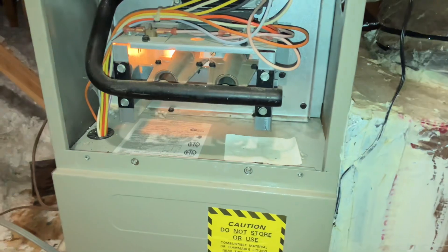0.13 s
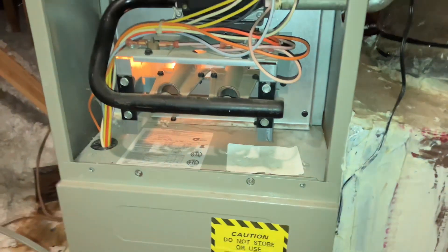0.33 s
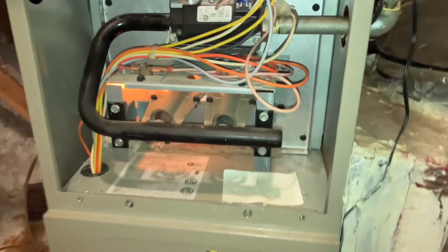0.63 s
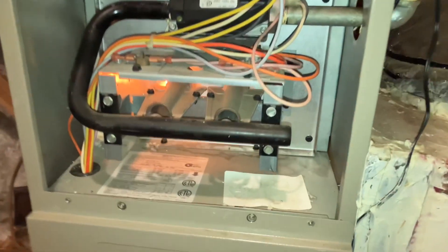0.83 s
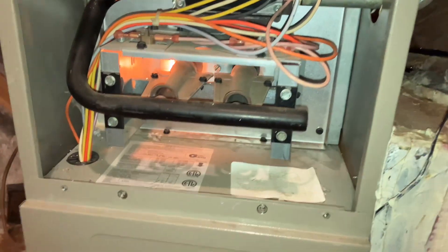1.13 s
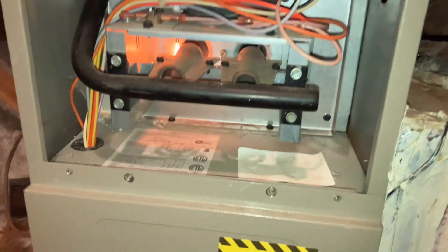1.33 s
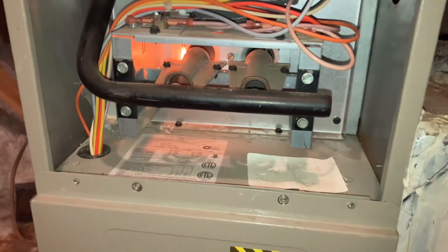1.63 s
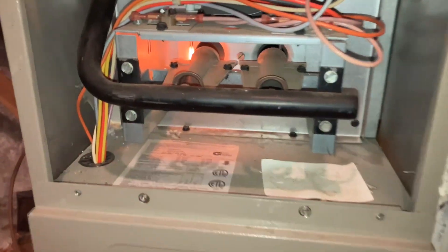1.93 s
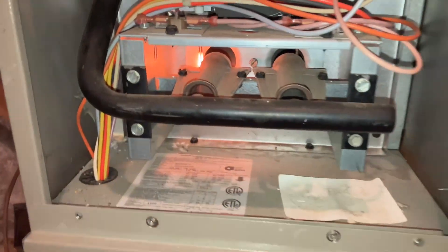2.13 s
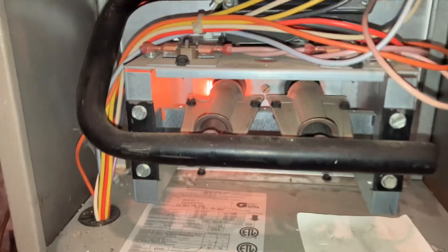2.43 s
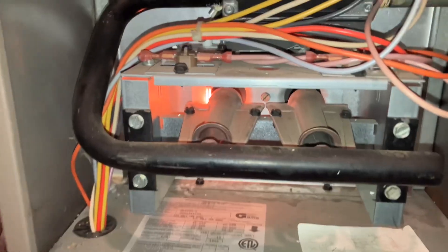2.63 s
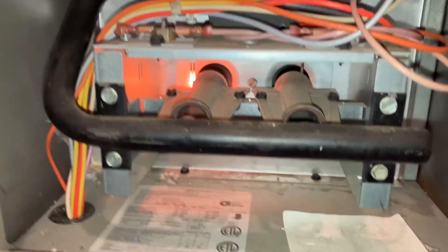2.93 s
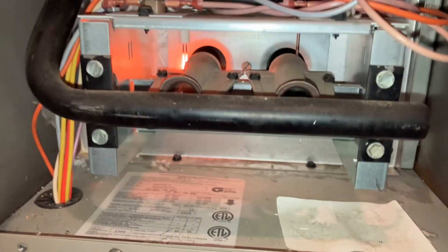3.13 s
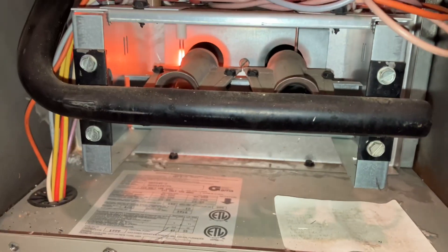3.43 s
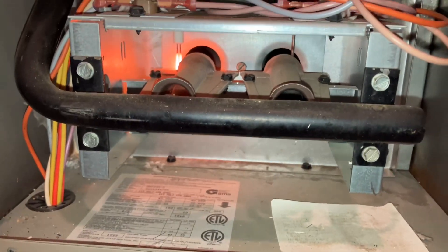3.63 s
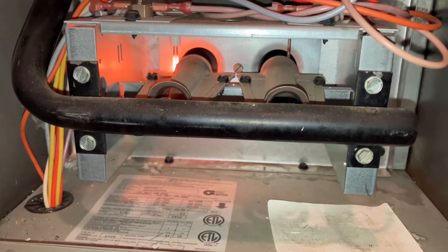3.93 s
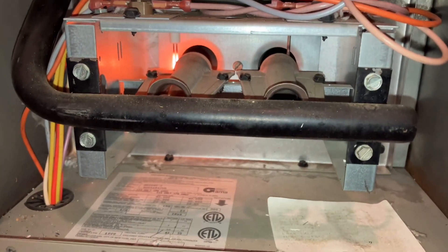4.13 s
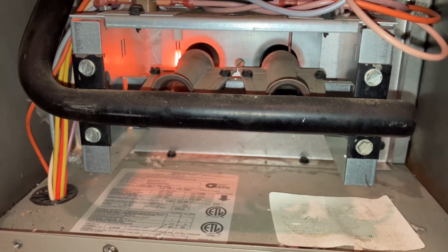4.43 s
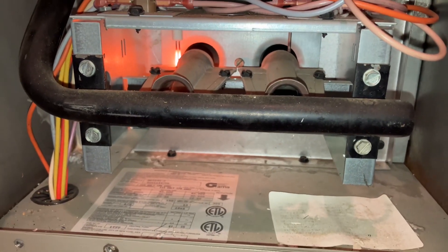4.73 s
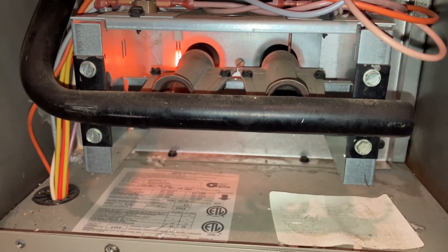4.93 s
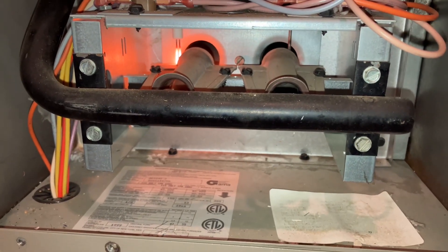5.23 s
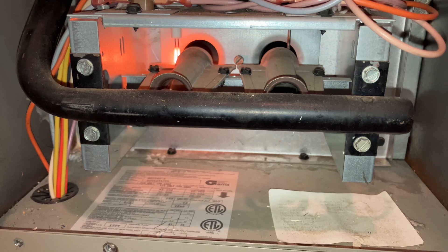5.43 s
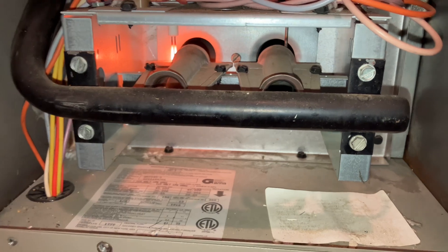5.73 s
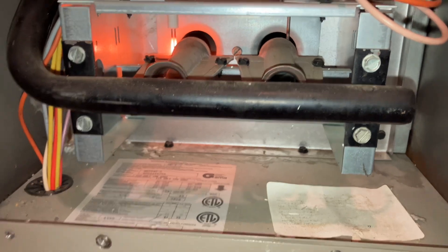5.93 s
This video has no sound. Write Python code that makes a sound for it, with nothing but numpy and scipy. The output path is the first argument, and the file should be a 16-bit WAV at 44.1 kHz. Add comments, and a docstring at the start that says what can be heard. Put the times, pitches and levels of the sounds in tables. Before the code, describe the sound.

A small furnace motor hums low and steady with rushing air inside a metal cabinet, growing closer and brighter as the microphone moves in.

```python
"""Furnace inducer motor in an attic

In an attic, a gas furnace's inducer motor hums steadily: shaft and mains pull together make families of tones.
The fan wheel pushes rushing air through the sheet-metal cabinet: shaped noise that booms low in one resonance
and whistles faintly in narrow cavity modes. The bearing sings in short pulses, one narrow ring of the housing.
A hand-held stereo microphone starts standing back, moves in towards the open burner compartment, then comes
down towards the level of the burner tubes, which shifts levels, colour and stereo image."""
import sys
import numpy as np
from scipy import signal
from scipy.fft import rfft, irfft, next_fast_len
from scipy.io import wavfile
from scipy.ndimage import uniform_filter1d, map_coordinates

SR = 44100
rng = np.random.default_rng(int(sys.argv[2]) if len(sys.argv) > 2 else 0)


def to_wav(s):
    """Save 16-bit WAV."""
    ch = np.atleast_2d(s).T  # columns
    pcm = np.round(np.clip(ch, -1, 1) * 32767)  # PCM
    wavfile.write(sys.argv[1], SR, pcm.astype(np.int16))


N = 267775
TIME = np.arange(N) / SR  # s
SHAFT_HZ = 55.275  # mean turns per second
PULL_HZ = 119.95  # magnetic pull, at twice the mains
EDGE_HZ = 15750  # upper band limit
START_CLOSENESS = -0.23  # a little farther off than standing back


def gain_of(db):
    """Decibels to amplitude."""
    return 10 ** (np.asarray(db) / 20)


def evened(x):
    """Scales to an rms of 1."""
    return x / np.sqrt(np.mean(abs(x) ** 2) + 1e-20)


def read(table, hz):
    """Each column of a table at the given frequencies, joined on a log axis."""
    f, *columns = np.transpose(table)
    return [np.interp(np.log(hz + 1), np.log(f), column) for column in columns]


def wander(rate_hz, size=8192):
    """Slow chance of rms 1, with changes up to about the given rate."""
    hz = np.fft.rfftfreq(size, TIME[-1] / size)
    low_pass = np.exp(-(hz / rate_hz) ** 2) * (hz > 0)
    slow = irfft(rfft(rng.standard_normal(size)) * low_pass)
    return np.interp(TIME, np.linspace(0, TIME[-1], size), evened(slow))


def fuzzy_swing(width_hz):
    """Random complex swing of rms 1 that spreads a ring over a narrow band."""
    return evened(wander(width_hz) + 1j * wander(width_hz))


def eased(t, start_s, length_s):
    """A move of the hand from 0 to 1 that starts and stops gently."""
    return .5 - .5 * np.cos(np.pi * np.clip((t - start_s) / length_s, 0, 1))


# The microphone's moves: (start [s], length [s], closeness gained [1], descent gained [1])
# closeness: 0 = standing back, 1 = at the burners; descent: 0 = above, 1 = level with the burner tubes
MICROPHONE_MOVES = [(.45, 0.54, 0.49, 0), (1.64, 0.7, 0.81, 0.13), (2.45, 0.73, 0.035, 0.73)]


def closeness(t):
    """How near the microphone is to the burners at the times t."""
    gained = sum(nearer * eased(t, start_s, length_s) for start_s, length_s, nearer, _ in MICROPHONE_MOVES)
    return START_CLOSENESS + gained


def lowered(t):
    """How far the microphone has come down to the level of the burner tubes at the times t."""
    return sum(lower * eased(t, start_s, length_s) for start_s, length_s, _, lower in MICROPHONE_MOVES)


def travelled(t):
    """How far the microphone has come along its path, in plus down."""
    return closeness(t) + lowered(t)


def panned(balance_db):
    """Left and right gains of mean power 1 for a level difference."""
    gains = gain_of(np.array([balance_db, -balance_db]) / 2)
    return gains / np.sqrt(np.mean(gains ** 2, axis=0))


def at_ports(swing, hz, lead):
    """A ring at hz with the given swing, as the two microphone ports hear it, the left leading by radians."""
    ring = np.sqrt(2) * swing * np.exp(2j * np.pi * hz * TIME)
    return np.array([ring, ring * np.exp(-1j * lead)]).real


def swelled(swing, swells, swell_s):
    """For a moment at each swell, a steady ring of that level takes over from the random swing."""
    for centre_s, db in swells:
        bell = np.exp(-((TIME - centre_s) / swell_s) ** 2)
        steady = gain_of(db) * np.exp(2j * np.pi * rng.random())
        swing = swing * (1 - bell) + bell * steady
    return swing


# Motor tones, before a common trim:
# (shaft multiple [1], pull multiple [1], level standing back [dB], level close [dB], left-right [dB])
MOTOR_TONES = [(1, 0, -43, -42.8, 0), (3, 0, -60, -52, 0), (8, 0, -48.7, -48.7, 1), (10, 0, -52, -52, -12),
               (11, 0, -68, -60, 0), (15, 0, -60, -62, 3), (16, 0, -49.5, -43.7, 0), (17, 0, -62, -55, 1),
               (18, 0, -47.6, -42.2, 2), (19, 0, -61, -50.5, 9), (20, 0, -65, -60, 1),
               (34, 0, -60, -59.5, -1), (40, 0, -73, -65, 1), (16, -1, -62, -64, -1), (17, -1, -61, -65, 0),
               (18, -1, -62, -56, -2), (0, 1, -38, -35.9, 1), (2, 1, -56, -47.5, 0), (14, 1, -59, -55, 0),
               (15, 1, -63, -59, 3), (16, 1, -54, -49, -1), (17, 1, -50.5, -40.2, 4), (18, 1, -58, -61, 12),
               (19, 1, -62, -58, 3), (36, 1, -59, -53, 0), (1, 2, -37.6, -36, 1), (2, 2, -42.5, -38.3, 2),
               (3, 2, -67, -57, 1), (14, 2, -75, -62, 0), (15, 2, -66, -61, 0), (17, 2, -55, -51, 6),
               (18, 2, -59, -52.5, 2), (19, 2, -65, -59, 12), (22, 2, -68, -64, 0), (35, 2, -73, -63, 12),
               (36, 2, -70, -65, 1), (-1, 3, -52, -47, 1), (0, 3, -48, -45, 2), (1, 3, -54, -55, 0),
               (16, 3, -65, -56, 3), (-1, 4, -56, -55, 0), (1, 4, -56, -57.5, -2), (0, 5, -62, -59, 0),
               (2, 6, -62, -62, 0)]


def motor(turns, trim_db=-0.23, waver_db=0.5, waver_hz=3, port_lag_s=.00004, descent_share=0.21):
    """Shaft orders, with side tones where the magnetic pull throbs against them."""
    near = (1 - descent_share) * closeness(TIME) + descent_share * lowered(TIME)
    out = np.zeros((2, N))
    for order, pull, back_db, close_db, balance_db in MOTOR_TONES:
        order, pull = round(order), round(pull)
        cycles = order * turns + pull * PULL_HZ * TIME + rng.random()
        lag = (order * SHAFT_HZ + pull * PULL_HZ) * port_lag_s  # cycles; the right port hears it a little later
        level_db = trim_db + back_db + near * (close_db - back_db)
        size = gain_of(level_db + waver_db * wander(waver_hz))
        tone = np.sin(2 * np.pi * np.array([cycles, cycles - lag]))
        out += np.sqrt(2) * size * panned(balance_db)[:, None] * tone
    return out


# The bearing sings out for a moment: (time [s], level [dB])
BEARING_SWELLS = [(1.725, -41), (2.352, -42), (3.127, -39.5), (3.312, -39), (3.70, -42), (3.761, -36.5),
                  (3.88, -36), (4.142, -37), (4.25, -40), (4.432, -37.5), (4.501, -38), (4.66, -46),
                  (4.811, -39), (4.919, -39), (5.493, -45), (5.572, -40.5), (5.68, -44), (5.752, -38)]


def bearing(turns, ring_hz=2106, width_hz=38, above_db=-58, low_db=-52.5, throb=0.49, rub_turn=0.51,
            slip_throb=0.66, slip_turn=0.33, swell_s=0.016, lead=0.86):
    """A rub once a turn excites a narrow ring of the housing; it pulses as the rotor slips behind the mains."""
    rub = 1 + throb * np.cos(2 * np.pi * (turns - rub_turn))
    slip = 1 + slip_throb * np.cos(2 * np.pi * (PULL_HZ * TIME - 2 * turns - slip_turn))
    ring = evened(rub * slip * fuzzy_swing(width_hz))
    ring *= gain_of(above_db + lowered(TIME) * (low_db - above_db))  # clearest in line with the burner tubes
    return at_ports(swelled(ring, BEARING_SWELLS, swell_s), ring_hz, lead)


def standing_waves(t, hz, spacing_hz=36, widening_hz=6000, steps_per_approach=2.41, sway_per_s=0.81, size=64):
    """Ripple of rms 1 over frequency from echoes between metal walls; it shifts as the microphone travels."""
    pattern = rng.standard_normal((1024, size))
    ripples = np.log1p(hz / widening_hz) * widening_hz / spacing_hz  # broader in the treble
    travel = steps_per_approach * travelled(t) + sway_per_s * t + 2
    places = np.broadcast_arrays(ripples, travel)
    return evened(map_coordinates(pattern, places, order=2, mode="mirror"))


def patches(shape, size=16, order=2):
    """Chance of rms 1 in patches about 170 Hz wide and a tenth of a second long."""
    across_hz = uniform_filter1d(rng.standard_normal(shape), size, axis=0)
    return evened(uniform_filter1d(across_hz, order, axis=1))


# Rush of air at the burners, before the cabinet colours it: (frequency [Hz], density [dB per Hz])
AIR_RUSH = [(22, -96), (45, -71), (62, -55), (130, -55.5), (330, -59), (480, -66), (750, -72), (1550, -79),
            (2700, -74), (3700, -79), (5400, -86), (6600, -84.5), (8000, -89), (11500, -91),
            (15500, -100.5)]
# Change of that rush when standing back: (frequency [Hz], change [dB])
STANDING_BACK_CHANGE = [(30, -3), (100, -2.5), (250, -4), (700, -1.5), (1250, -0.5), (2200, -2),
                        (2800, -1.5), (3300, -4), (4200, -3), (15500, -0.5)]
# Resonances of the cabinet and the burner tubes:
# (centre [Hz], width [Hz], boost from above [dB], boost level with the tubes [dB])
CABINET_RESONANCES = [(126, 13, 4, 0), (172, 14, 0.5, -10), (209, 61, 0.9, 3), (274, 18.6, 5.5, 7),
                      (325, 24, 1, 1), (398, 28, -3.5, -1), (421, 34, 4.5, 3), (476, 14, 5, 1.5),
                      (597, 55, 5.5, 4.5), (1122, 420, 8, 7), (1438, 127, 4.5, 7.5), (1797, 273, 7.5, 6),
                      (2088, 150, 7.5, 10), (2290, 110, 6, 2), (2460, 110, 4, -1), (2730, 480, 2, -1),
                      (3160, 170, 0, 2.5), (3380, 100, -0.5, -3), (3630, 120, -0.5, 2), (4100, 140, 0, 0),
                      (4470, 680, 3, 0), (7980, 340, 6, 7)]
# The two microphone ports in that rush, likeness before a cap: (frequency [Hz], likeness from above [0-1],
# likeness level with the tubes [0-1], lead of the left [rad], left-right [dB])
MICROPHONE_PORTS = [(60, 1, 1, 0, 0), (326, 1, 0.99, 0.36, -0.1), (674, 0.92, 0.74, -0.6, 0.5),
                    (1100, 0.7, 1, -0.1, 2.5), (1600, 0.8, 0.49, 0.23, 0), (2000, 0.95, 0.72, 1.1, 2.5),
                    (2850, 0.7, 0.022, 1.4, 1.5), (4440, 0.02, 0, 2.5, 1.5), (5720, 0.9, 0.77, 2, 1),
                    (8700, 1, 1, -2.5, -1), (11470, 1, 1, -6.5, 0.5), (13800, 1, 1, -10, 0),
                    (16800, 1, 1, -12, 2)]
# The hiss comes and goes in patches: (frequency [Hz], depth [dB])
HISS_PATCHES = [(400, .2), (1500, .9), (3200, 1.5), (5500, 1.6), (8000, .8)]


def airflow(size=4096):
    """Turbulence from the fan wheel, coloured by resonances whose strength shifts as the microphone descends."""
    white = rng.standard_normal((2, N)) * np.sqrt(SR / 2)  # 0 dB per Hz
    hz, t, (shared, own) = signal.stft(white, SR, nperseg=size)
    hz = hz[:, None]
    low = lowered(t)
    colour_db = read(AIR_RUSH, hz)[0] + (1 - closeness(t)) * read(STANDING_BACK_CHANGE, hz)[0]
    for centre_hz, width_hz, above_db, low_db in CABINET_RESONANCES:
        bell = .5 ** ((2 * (hz - centre_hz) / width_hz) ** 2)
        colour_db = colour_db + bell * (above_db + low * (low_db - above_db))
    # short waves crowd the cabinet with modes, and each port sits in its own spot among them
    depth_db = np.interp(hz, [400, 2400, 4500, 8000], [.7, 2.1, 2.1, 1.3])
    ripple_db = depth_db * np.array([standing_waves(t, hz), standing_waves(t, hz)])
    patch_db = read(HISS_PATCHES, hz)[0] * patches(shared.shape)
    like_above, like_low, lead, balance_db = read(MICROPHONE_PORTS, hz)
    most_alike = np.interp(hz, [500, 6000], [1, .92])
    likeness = np.clip(like_above + low * (like_low - like_above), 0, most_alike)
    right = (likeness * shared + np.sqrt(1 - likeness ** 2) * own) * np.exp(-1j * lead)
    gains = panned(balance_db) * gain_of(colour_db + ripple_db + patch_db)
    return signal.istft(np.array([shared, right]) * gains, SR, nperseg=size)[1][:, :N]


# Eddies of each size make their own part of the rush flutter: (frequency [Hz], depth [dB], rate [changes per s])
AIR_EDDIES = [(75, 1, 7.2), (220, 1, 8.1), (603, 0.77, 12), (2000, .5, 18), (5000, 0.76, 31),
              (11000, 0.9, 28)]


def buffeted(air, turns, gust_db=0.43, gust_hz=14, wobble=.02, wobble_turn=0.44):
    """Eddies shake each band by itself, gusts shake them all, and the fan wheel adds a slight pulse once a turn."""
    size = next_fast_len(N)
    spectrum = rfft(air, size)
    hz = np.fft.rfftfreq(size, 1 / SR)
    out = np.zeros((2, N))
    # overlapping bands that add up to the whole rush
    shares = read(np.column_stack([np.array(AIR_EDDIES)[:, 0], np.eye(len(AIR_EDDIES))]), hz)
    for share, (_, depth_db, rate_hz) in zip(shares, AIR_EDDIES):
        band = irfft(spectrum * share, size)[:, :N]
        out += band * evened(gain_of(depth_db * wander(rate_hz)))
    wheel_pulse = 1 + wobble * np.cos(2 * np.pi * (turns - wobble_turn))
    return out * gain_of(gust_db * wander(gust_hz)) * wheel_pulse


# The low roar swells briefly: (time [s], level [dB])
ROAR_SURGES = [(2.392, -27), (2.482, -31.5), (2.619, -25), (3.102, -28.5), (4.362, -26), (4.5, -29),
               (5.098, -29), (5.951, -29.5)]


def roar(ring_hz=129, width_hz=13, back_db=-43.0, close_db=-41.5, surge_s=0.023, lead=.05):
    """The draught booms unevenly in a low resonance of the cabinet."""
    level_db = back_db + closeness(TIME) * (close_db - back_db)
    swing = fuzzy_swing(width_hz) * gain_of(level_db)
    return at_ports(swelled(swing, ROAR_SURGES, surge_s), ring_hz, lead)


# Narrow cavity modes, each loudest at one spot on the microphone's path (closeness plus descent):
# (frequency [Hz], width [Hz], level elsewhere [dB], level added at the spot [dB], spot [path],
# reach around it [path], lead of the left [rad])
CAVITY_WHISTLES = [(1840, 54, -66, -56, 2, .6, 0.4), (2058, 36, -60.5, -49.7, .3, 1.6, 0.71),
                   (2170, 30, -60.5, -56, 1.3, .6, 1.4), (2352, 33, -58.5, -46, 1.33, .2, 1.6),
                   (2336, 36, -61, -52.5, .25, .5, 1.6), (2462, 32, -67, -49.7, 0.73, 0.82, 1),
                   (2820, 55, -71, -56, 0.35, .25, 1.2), (3120, 60, -66, -54, 1.22, .45, 1.4)]


def whistles(drift=.008, drift_hz=1.3):
    """Turbulence keeps cavity modes ringing, unsteady in pitch; each stands out as the microphone nears its spot."""
    place = travelled(TIME)
    out = np.zeros((2, N))
    for hz, width_hz, elsewhere_db, spot_db, spot, reach, lead in CAVITY_WHISTLES:
        drift_cycles = np.cumsum(hz * drift * wander(drift_hz)) / SR
        swing = fuzzy_swing(width_hz) * np.exp(2j * np.pi * drift_cycles)
        within = np.exp(-((place - spot) / reach) ** 2)
        out += at_ports(swing * (gain_of(elsewhere_db) + within * gain_of(spot_db)), hz, lead)
    return out


def scene(speed_drift_hz=0.0081):
    """The shaft turns at a nearly even speed and drives the tones, the rub and the pulse in the rush of air."""
    turns = np.cumsum(SHAFT_HZ + speed_drift_hz * wander(0.74)) / SR
    return motor(turns) + bearing(turns) + buffeted(airflow(), turns) + roar() + whistles()


def record(dry, start_s=0.035, fade_s=0.061, fade_curve=1.06):
    """The recorder fades in as it starts and stops without a click; then the band limit."""
    opened = dry * np.clip((TIME - start_s) / fade_s, 0, 1) ** fade_curve
    closed = opened * np.minimum((TIME[-1] - TIME) / .002, 1)
    low_pass = signal.firwin(511, EDGE_HZ, window=("kaiser", 9), fs=SR)
    return signal.oaconvolve(closed, low_pass[None], "same")


dry = scene()
out = record(dry)
to_wav(out)
```